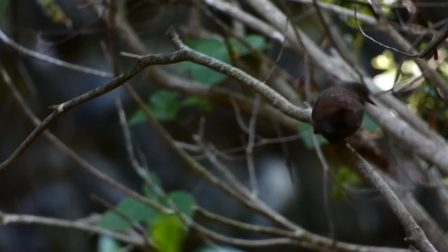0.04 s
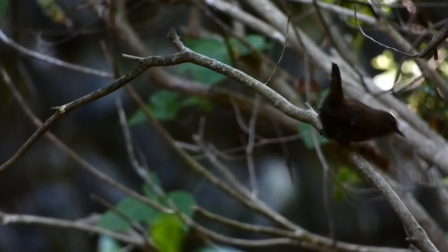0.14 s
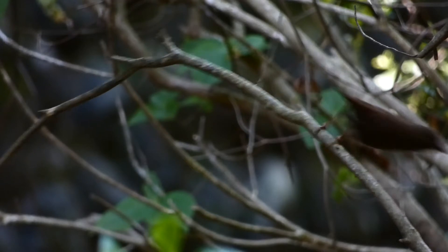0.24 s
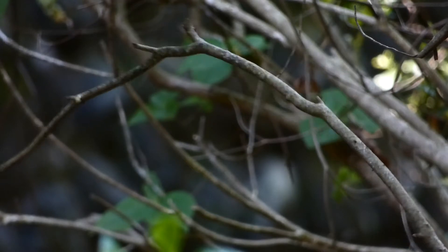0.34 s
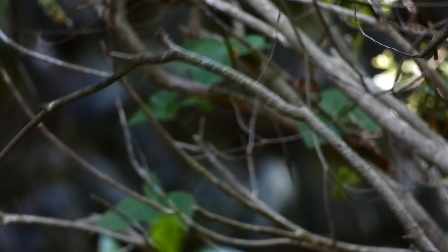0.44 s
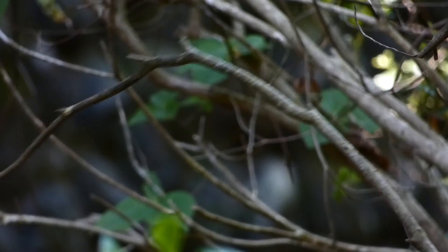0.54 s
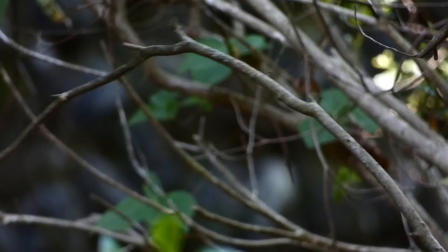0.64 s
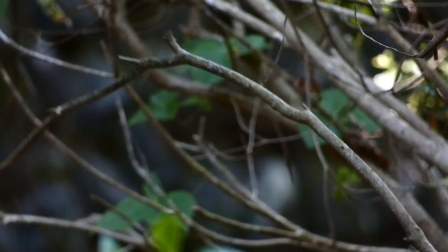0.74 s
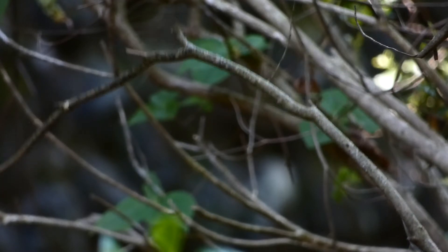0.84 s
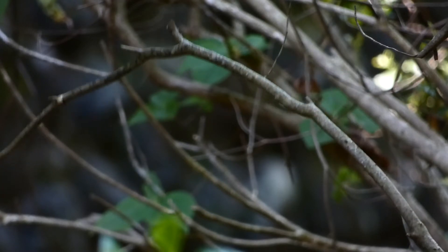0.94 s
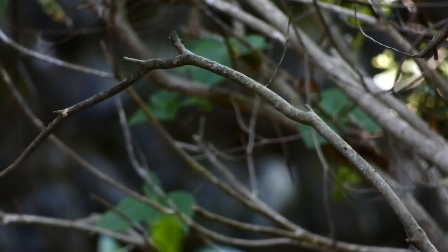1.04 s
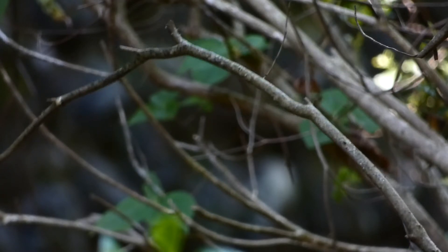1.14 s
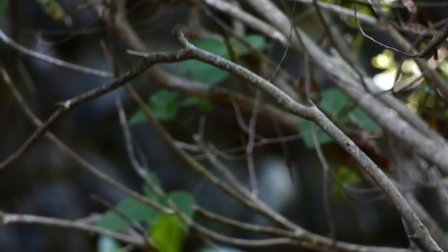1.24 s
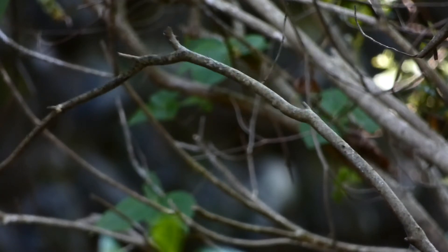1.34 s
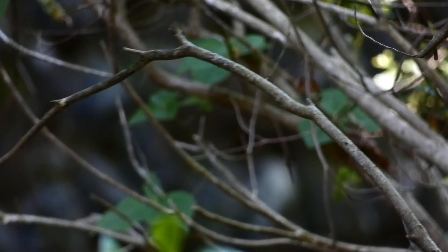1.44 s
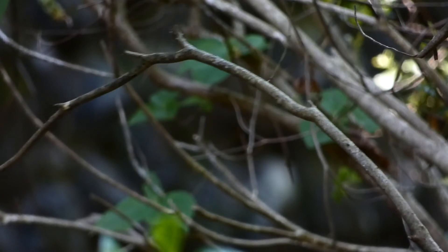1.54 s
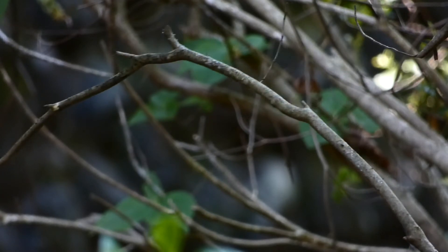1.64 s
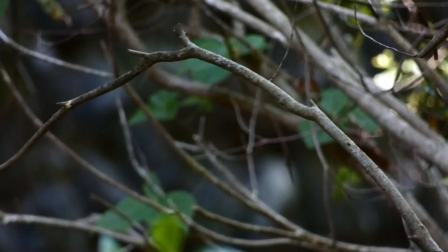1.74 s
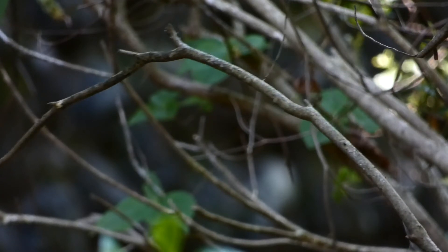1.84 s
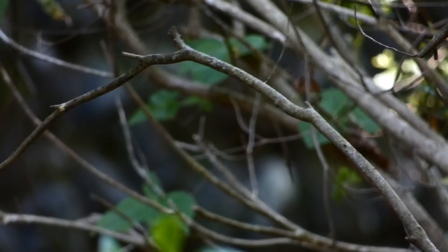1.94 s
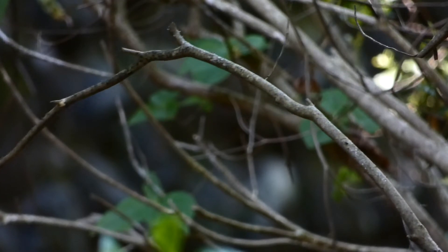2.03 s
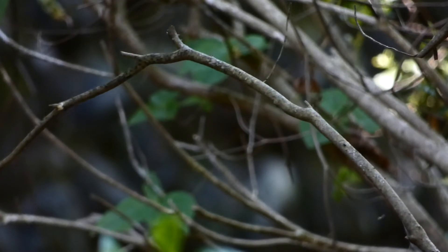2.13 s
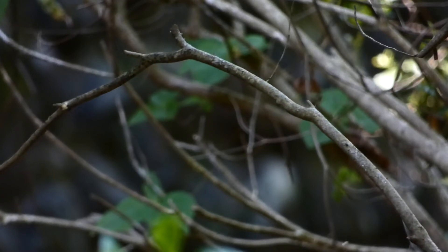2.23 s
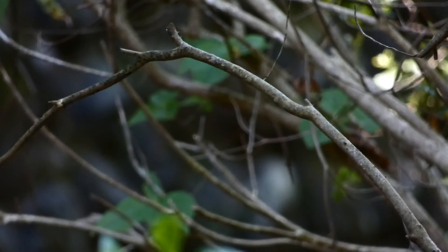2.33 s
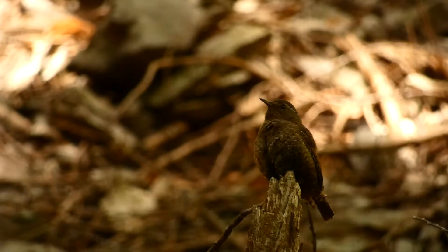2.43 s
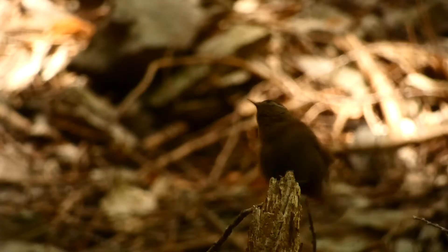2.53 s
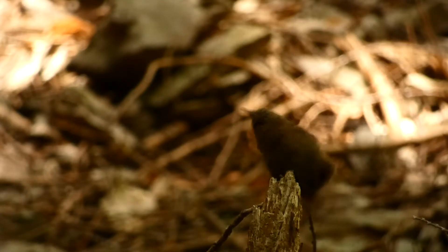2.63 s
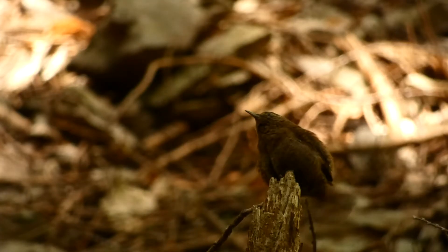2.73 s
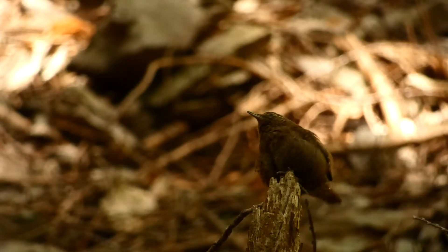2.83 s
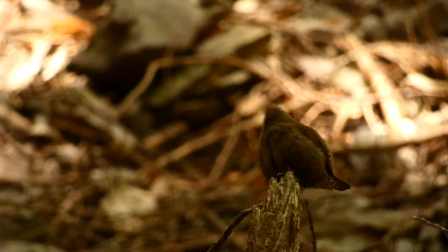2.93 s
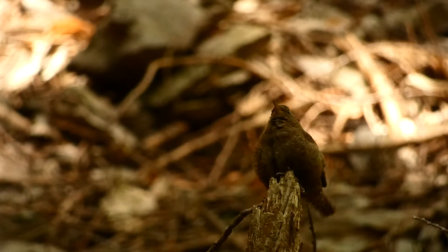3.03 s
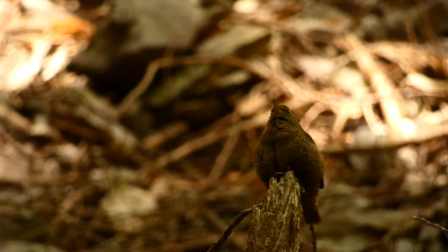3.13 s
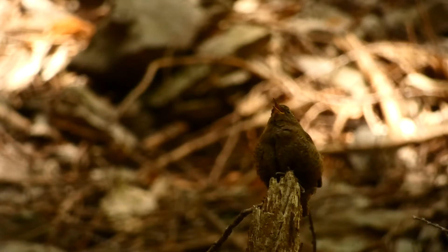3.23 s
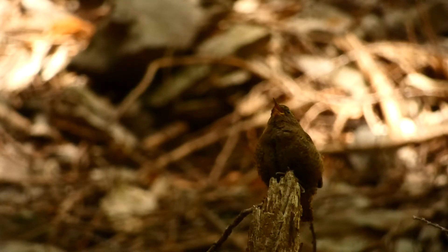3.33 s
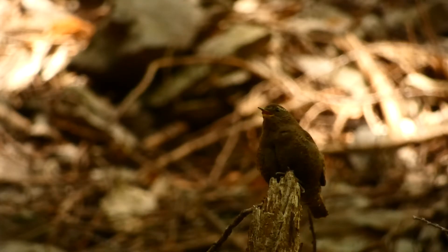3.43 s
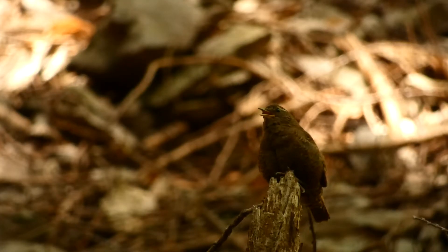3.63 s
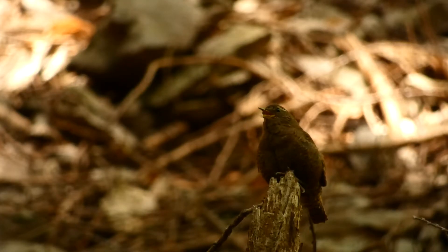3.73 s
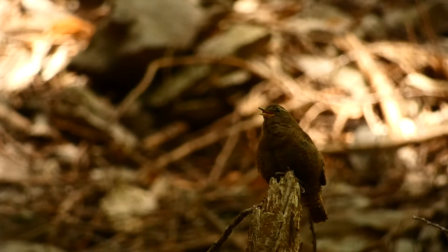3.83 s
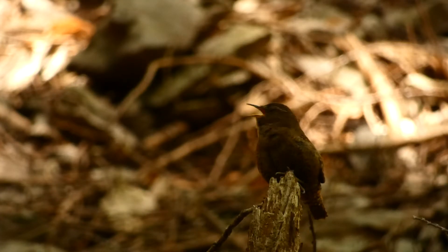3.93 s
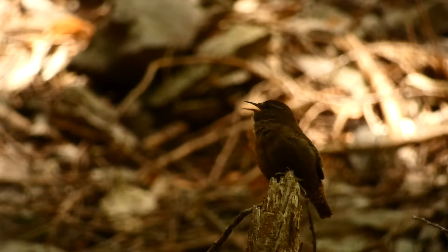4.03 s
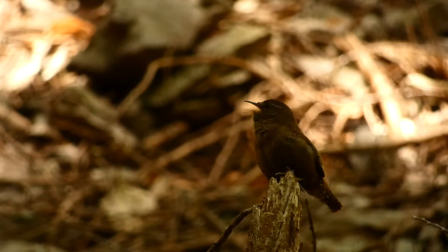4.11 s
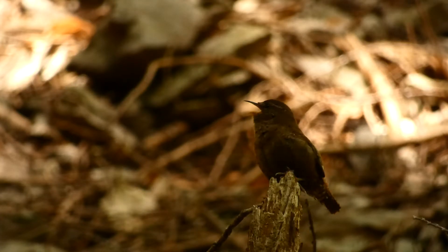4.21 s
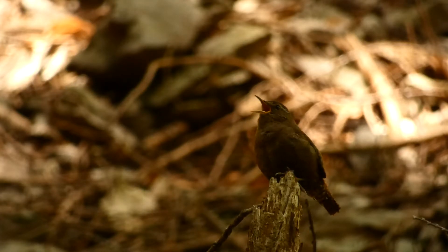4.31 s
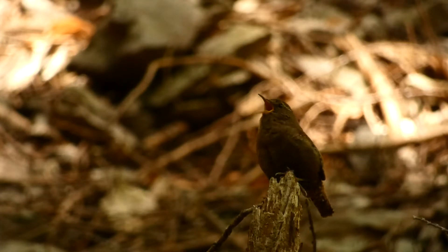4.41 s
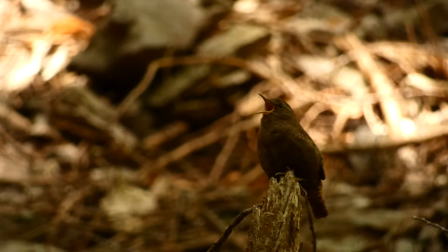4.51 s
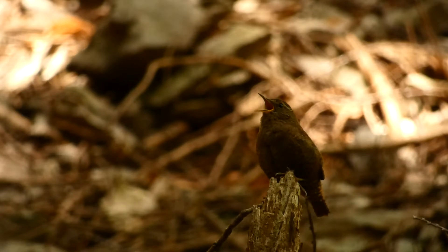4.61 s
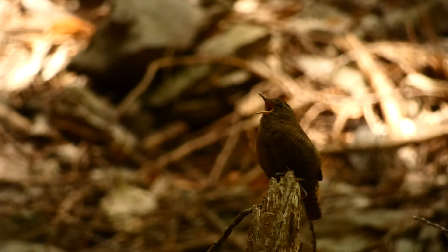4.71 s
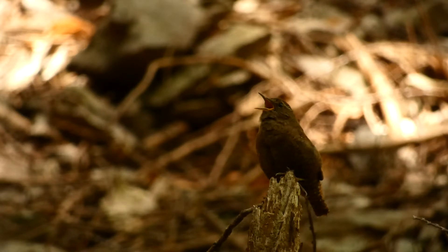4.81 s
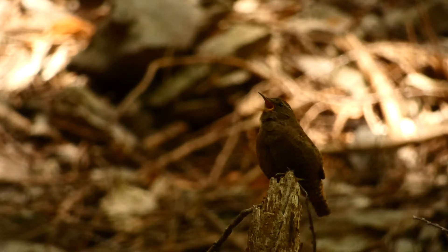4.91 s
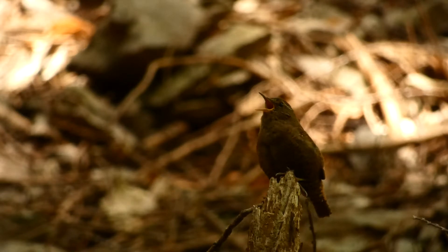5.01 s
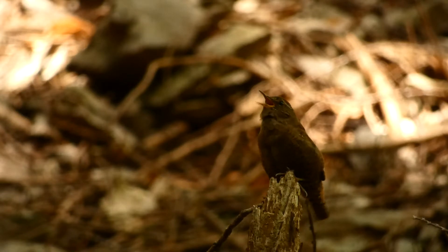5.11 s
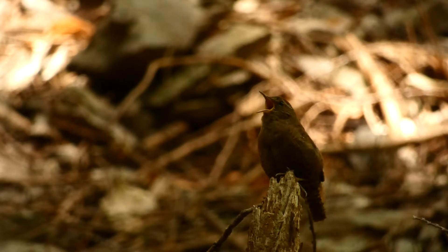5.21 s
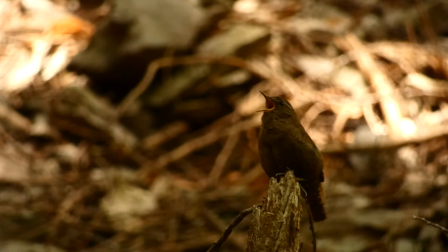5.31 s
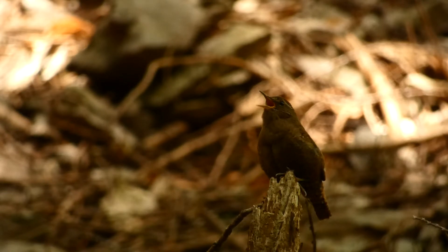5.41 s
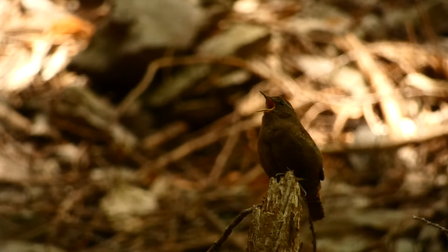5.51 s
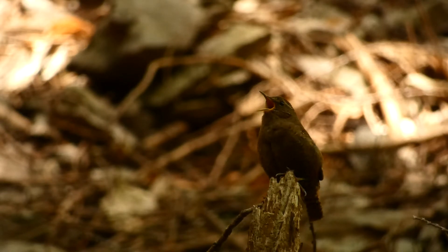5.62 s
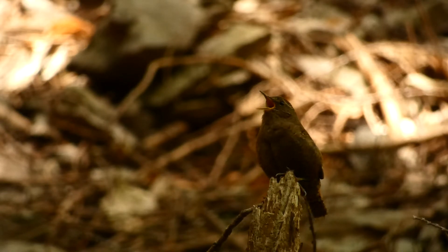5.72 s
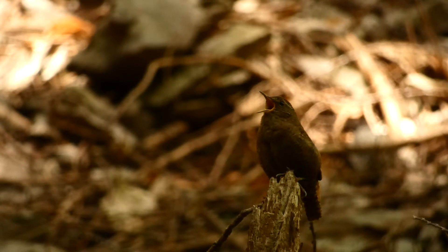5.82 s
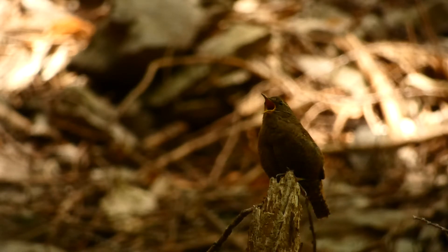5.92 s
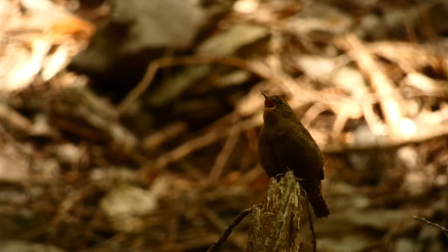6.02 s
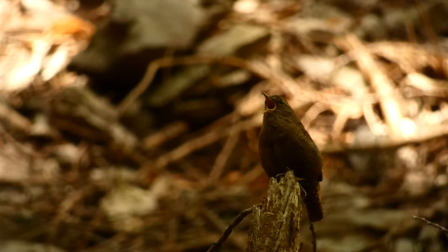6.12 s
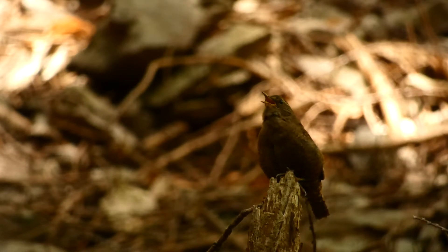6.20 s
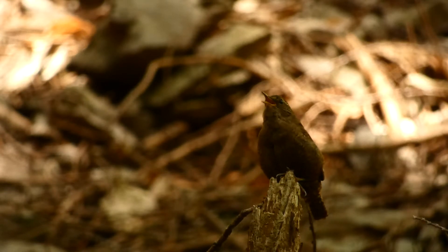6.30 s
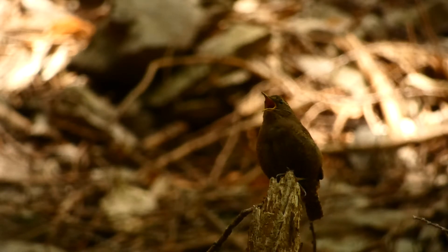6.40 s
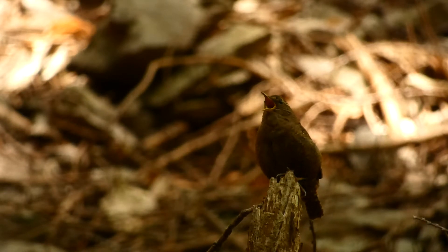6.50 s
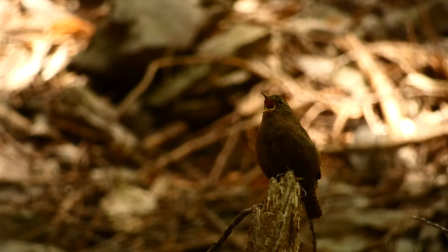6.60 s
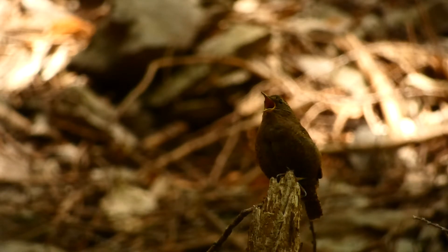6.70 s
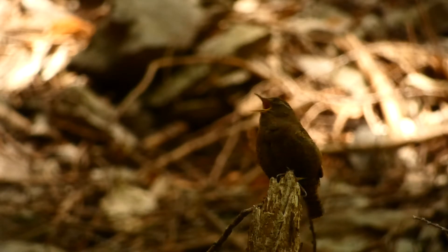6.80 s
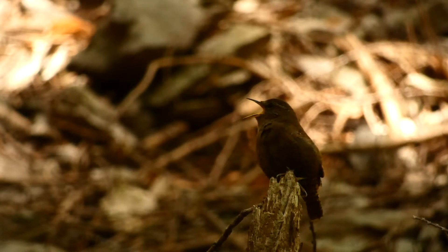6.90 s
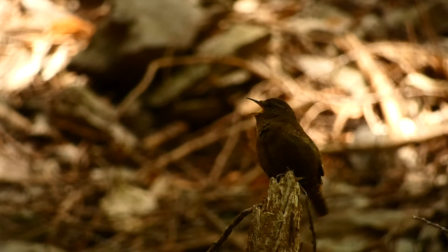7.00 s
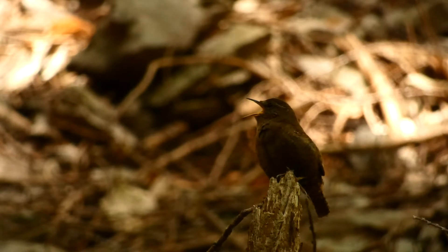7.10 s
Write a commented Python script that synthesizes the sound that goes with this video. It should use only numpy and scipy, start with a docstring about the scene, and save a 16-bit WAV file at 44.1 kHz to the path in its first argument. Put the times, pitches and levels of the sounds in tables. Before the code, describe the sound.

A soft, steady wash of air and water fills a woodland, with faint gurgles and tiny chucks. From about 0.4 seconds a distant wren sings thin, high, echoing notes, growing louder and ending in a quick rough trill from 1.9 to 2.5 seconds. Very faint crows caw in the first second or so.

At 2.6 seconds the sound drops out for an instant and returns with a similar hiss, a faint low wavering hum, soft coos and a second thin, far whistler. From 3 seconds a wren sings close by, louder and clearer, with a short echo. Separate whistles lead to a fast rattle from 4 to 4.5 seconds, three diving notes, then loud rising and falling sweeps from 5.1 to 5.6 seconds. High scooping whistles and sharp downward slurs continue until the end, just after 7 seconds, with two faint caws around 6 and 6.5 seconds.

```python
"""Woodland: a wren sings far among the trees, then, after a brief silence, from a stump close by.
Each note is one gliding whistle that trunks scatter into a long tail.
A soft wash of air and water lies behind it, with gurgles at the far place and a low hum at the near.
Faint chucks, hoarse distant crows, soft coos and a second thin whistler echo through the wood."""
import sys
import numpy as np
from scipy import signal
from scipy.fft import rfft, irfft, next_fast_len
from scipy.io import wavfile
from scipy.ndimage import uniform_filter1d

SR = 44100
rng = np.random.default_rng(int(sys.argv[2]) if len(sys.argv) > 2 else 0)


def pcm_store(signal):
    """Save signal as 16-bit PCM."""
    levels = np.round(np.clip(np.atleast_2d(signal), -1, 1) * 32767)
    wavfile.write(sys.argv[1], SR, levels.astype(np.int16).T)


N = 315315
TIME = np.arange(N) / SR
ALONG = np.linspace(0, 1, 65)  # position within a note


def amp(db):
    """Decibels to gain."""
    return 10 ** (np.asarray(db) / 20)


def unit(x):
    """Scales to rms 1."""
    return x / np.sqrt(np.mean(x ** 2) + 1e-20)


def read(points, hz):
    """Table lookup on a log-frequency axis."""
    freq_hz, value = np.transpose(points)
    return np.interp(np.log(hz + 1), np.log(freq_hz + 1), value)


def add(mix, start_s, sound):
    """Mixes a sound in at start_s."""
    part = mix[max(round(start_s * SR), 0):][:len(sound)]
    part += sound[:len(part)]


def band(size, hz, width_hz):
    """Gaussian noise band, rms 1; a slow wander when centred on 0 Hz."""
    padded = next_fast_len(size + 4096)
    bell = np.exp(-.5 * ((np.fft.rfftfreq(padded, 1 / SR) - hz) / width_hz) ** 2)
    return unit(irfft(rfft(rng.standard_normal(padded)) * bell, padded))[:size]


def puffs(rows, length_s, width_hz):
    """Rounded bursts of narrowband noise."""
    out, size = np.zeros(N), int(length_s * SR)
    for start_s, hz, db in rows:
        add(out, start_s, amp(db) * unit(band(size, hz, width_hz) * np.hanning(size)))
    return out


# left-right likeness of the wash: freq_hz, correlation
WASH_LIKENESS = [(50, -.1), (150, 0.4), (350, 0.03), (650, 0.05), (1200, 0.13), (3000, 0.45), (12000, 0)]

def wash(spectrum, patchy_db):
    """Air and water: steady noise with drifting patches, partly alike in both ears."""
    frames, hz = N // 256 + 5, np.fft.rfftfreq(1024, 1 / SR)
    noise = rng.standard_normal((5, frames, len(hz))).transpose(0, 2, 1)
    left, apart = noise[0] + 1j * noise[1], noise[2] + 1j * noise[3]
    patches = unit(uniform_filter1d(uniform_filter1d(noise[4], size=8, axis=0), size=14, axis=1))
    likeness = read(WASH_LIKENESS, hz)[:, None]
    ears = np.array([left, likeness * left + np.sqrt(1 - likeness ** 2) * apart])
    ears *= amp(read(spectrum, hz)[:, None] + patchy_db * patches)
    return unit(signal.istft(ears, nperseg=1024, noverlap=768)[1][:, :N])


# far wash spectrum: freq_hz, relative_db
FAR_SPECTRUM = [(30, -18), (80, -23.5), (140, -2), (300, -6), (450, -6.5), (800, -8), (1300, -12),
                (2100, -15.5), (3000, -22), (6500, -21.5), (8500, -39), (10000, -30.5), (12500, -37.5),
                (15000, -39)]
# swell of its low band: time_s, gain_db
LOW_SWELL = [(0, 1), (1.3, 2.5), (1.8, 5.5), (2.2, 7), (2.6, 5)]

def far_wash():
    """Wash at the far place; its low band swells."""
    air = amp(-57) * wash(FAR_SPECTRUM, patchy_db=1.2)
    low = signal.sosfilt(signal.butter(1, (280, 650), "band", fs=SR, output="sos"), air)
    swell = amp(np.interp(TIME, *np.transpose(LOW_SWELL)))
    return air + (swell - 1) * low


# water gurgles: start_s, centre_hz, level_db
WATER_GURGLES = [(.1, 550, -64.5), (.315, 598, -58), (.42, 588, -63.5), (.52, 630, -61), (.715, 618, -58),
                 (.89, 612, -61), (.98, 566, -60.5), (1.065, 596, -60), (1.28, 603, -62), (1.515, 607, -58),
                 (1.75, 598, -59), (1.855, 593, -60.5), (1.945, 617, -60), (2.245, 630, -57.5)]

def water():
    """Steady burble and hollow gurgles, all near one pitch."""
    burble = amp(-63) * np.array([band(N, hz=622, width_hz=32) for ear in range(2)])
    return burble + puffs(WATER_GURGLES, length_s=.053, width_hz=24.5)


# undergrowth chucks: start_s, centre_hz, level_db
CHUCK_CALLS = [(.11, 1710, -65), (0.186, 1440, -66), (.19, 2100, -68), (0.709, 1580, -68),
               (1.45, 1480, -72), (1.68, 1300, -65), (1.841, 1410, -62.5), (2.134, 1330, -61.5),
               (2.14, 2090, -67), (2.455, 1650, -64.5), (2.504, 1410, -60)]

def chucks():
    """Short faint noise bursts in the undergrowth."""
    return puffs(CHUCK_CALLS, length_s=.027, width_hz=136)


def song(notes, waver, flutter_db, edge_s, octave_db=-60, glint_hz=4800, spread_hz=350):
    """Trembling, nearly pure glides; the throat passes a faint octave near glint_hz."""
    out = np.zeros(N)
    for start_s, length_s, pitch_hz, level_db in notes:
        fade_s = edge_s + .07 * length_s
        t = np.arange(-fade_s / 2, length_s + fade_s / 2, 1 / SR)
        hz = np.interp(t / length_s, ALONG, pitch_hz)
        phase = 2 * np.pi * np.cumsum(hz * (1 + waver * band(len(t), 0, 140))) / SR
        strength = amp(np.interp(t / length_s, ALONG, level_db) + flutter_db * band(len(t), 0, 76))
        fade = np.sin(np.pi / 2 * np.clip(np.minimum(t - t[0], t[-1] - t) / fade_s, 0, 1)) ** 2
        glint = np.exp(-.5 * ((hz - glint_hz) / spread_hz) ** 2)
        octave = amp(octave_db) * band(len(t), 0, 200) * glint
        add(out, start_s + t[0], strength * fade * (np.sin(phase) + octave * np.sin(2 * phase)))
    return out


def loudness(db, swell_db, arch_db):
    """Note level: a ramp of swell_db, with both ends arch_db lower."""
    return db + swell_db * (ALONG - .5) - arch_db * abs(2 * ALONG - 1) ** 2.4


def slur(start_s, length_s, db, swell_db, from_hz, to_hz, bend, scoop_hz=0, scoop_s=.04, *, arch_db):
    """Exponential glide, entered scoop_hz low; bend > 0 moves early, bend < 0 late."""
    travel = np.cumsum(np.exp(-bend * ALONG))
    glide_hz = from_hz + (to_hz - from_hz) * (travel - travel[0]) / (travel[-1] - travel[0])
    scoop = np.maximum(1 - ALONG * length_s / scoop_s, 0) ** 2
    return start_s, length_s, glide_hz - scoop_hz * scoop, loudness(db, swell_db, arch_db)


def even_slurs(rows, bend, arch_db):
    """Slurs with one bend and no swell."""
    return [slur(start_s, length_s, db, 0, from_hz, to_hz, bend, arch_db=arch_db)
            for start_s, length_s, db, from_hz, to_hz in rows]


def trill(syllable, repeats, arch_db):
    """A syllable of slurs, repeated with shifts of level and pitch."""
    return [slur(start_s + delay_s, length_s, db + shift_db, swell_db,
                 from_hz + shift_hz, to_hz + shift_hz, bend, scoop_hz, arch_db=arch_db)
            for start_s, shift_db, shift_hz in repeats
            for delay_s, length_s, db, swell_db, from_hz, to_hz, bend, scoop_hz in syllable]


def woods(sound, decay, onset_s, early_db, early_s, likeness):
    """Trunk echoes: strong early scatter, then a long tail whose decay varies with frequency."""
    t = np.arange(int(1.5 * SR)) / SR
    taps = rng.standard_normal((3, len(t))) * (rng.random((3, len(t))) < .03 + .5 * t)
    taps *= (1 - np.exp(-(t / onset_s) ** 2)) * (1 + amp(early_db) * np.exp(-t / early_s))
    ears = np.sqrt(likeness) * taps[2] + np.sqrt(1 - likeness) * taps[:2]
    hz, age_s, spectra = signal.stft(ears, SR, nperseg=256)
    tail = signal.istft(spectra * amp(-60 * age_s / read(decay, hz)[:, None]), SR, nperseg=256)[1]
    tail /= np.linalg.norm(tail, axis=1, keepdims=True)
    return signal.fftconvolve(sound[None], tail, axes=1)[:, :N]


# raspy notes: start_s, length_s, level_db, from_hz, to_hz
RASPY_NOTES = [(.425, 0.05, -60, 5980, 5880), (.69, 0.048, -61, 7000, 7720),
               (.77, 0.034, -53.5, 5890, 5580), (1.125, 0.13, -51, 7960, 7680),
               (1.28, .08, -50.5, 7980, 7750), (1.8, 0.038, -57, 6900, 6800)]
# clear notes: start_s, length_s, level_db, swell_db, from_hz, to_hz, bend
CLEAR_NOTES = [(0.475, 0.082, -58.5, -6, 5500, 5160, 1), (0.571, 0.054, -48, 12, 3980, 3610, 0.2),
               (0.662, 0.066, -55.5, -13, 3840, 3656, 0.5), (0.833, 0.055, -40.5, -5, 5265, 5276, -2),
               (0.942, 0.12, -40.5, 9, 6540, 6273, 5), (1.406, 0.072, -36, 7, 6200, 6267, 1.5),
               (1.463, 0.047, -35, -1, 6350, 4520, 0.4), (1.541, 0.043, -52.5, 0, 3990, 4090, 2.5),
               (1.619, 0.049, -38.5, 4, 4073, 4066, 0.5), (1.698, .058, -36.5, -3, 5003, 5130, -0.5),
               (1.781, 0.03, -38.5, -3, 6560, 6310, 0), (1.854, 0.05, -37, 4, 6050, 4780, -0.4)]
# trill syllable: delay_s, length_s, level_db, swell_db, from_hz, to_hz, bend, scoop_hz
TRILL_SYLLABLE = [(.003, .021, -38.5, 5, 5250, 6095, 0.27, 0), (.04, .056, -32, 4.5, 6185, 4437, 2.2, 0)]
# trill repeats: start_s, shift_db, shift_hz
TRILL_REPEATS = [(1.924, 0, 50.5), (2.054, -2.5, 7), (2.176, -3.5, 18.5), (2.298, -2.5, 27),
                 (2.418, -4.5, -44)]
# echo decay, far place: freq_hz, t60_s
FAR_DECAY = [(3750, 0.39), (4100, 0.79), (5000, 0.64), (6500, 0.42), (8500, 0.62)]

def far_wren():
    """Wren deep in the trees, more echo than voice: thin notes, then a rough trill."""
    clear = [slur(*row, arch_db=5.5) for row in CLEAR_NOTES]
    raspy = even_slurs(RASPY_NOTES, bend=1.5, arch_db=8)
    syllables = trill(TRILL_SYLLABLE, TRILL_REPEATS, arch_db=6.5)
    voice = song(clear, waver=.006, flutter_db=1.6, edge_s=.008)
    voice += song(raspy, waver=.018, flutter_db=2.5, edge_s=.01)
    voice += song(syllables, waver=.011, flutter_db=2, edge_s=.008)
    echo = woods(voice, FAR_DECAY, onset_s=.0026, early_db=3, early_s=.022, likeness=.76)
    return (amp(-7) * voice + echo) * amp([[.3], [-.3]])


# caws: start_s, length_s, pitch_hz, resonance_hz, level_db
CROW_CAWS = [(0.439, 0.067, 414, 1200, -62.5), (0.762, 0.085, 407.4, 1130, -62),
             (1.126, 0.13, 415.5, 1100, -64), (5.957, 0.1, 371, 1056, -63), (6.484, 0.11, 336, 950, -57)]

def crows(width_hz=390, upper_hz=2150, upper_db=-15, rasp_hz=33, rasp_db=5):
    """Hoarse, throbbing arched calls through two throat resonances."""
    def resonance(hz, centre_hz):
        return 1 / (1 + ((hz - centre_hz) / width_hz) ** 2) ** 2

    out = np.zeros(N)
    for start_s, length_s, pitch_hz, lower_hz, db in CROW_CAWS:
        arch = np.sin(np.linspace(0, np.pi, int(length_s * SR)))
        hz = pitch_hz * (.93 + .07 * arch + .05 * band(len(arch), 0, 200))
        phase = 2 * np.pi * np.cumsum(hz) / SR
        voice = sum((resonance(k * hz, lower_hz) + amp(upper_db) * resonance(k * hz, upper_hz))
                    * np.sin(k * phase) for k in range(2, 8))
        rasp = amp(-rasp_db * np.cos(2 * np.pi * rasp_hz * TIME[:len(arch)]))
        add(out, start_s, amp(db) * unit(np.sqrt(abs(arch)) * rasp * voice))
    return out


# soft coos: start_s, length_s, level_db
COO_NOTES = [(2.617, 0.25, -67), (3.524, 0.3, -69.5), (4.67, 0.29, -70), (4.967, 0.13, -68.5),
             (5.669, 0.32, -71), (6.748, 0.29, -70.5)]

def coos(pitch_hz=369, waver=.009):
    """Low hollow notes on one pitch, unsteady in strength."""
    out = np.zeros(N)
    for start_s, length_s, db in COO_NOTES:
        size = int(length_s * SR)
        phase = 2 * np.pi * np.cumsum(pitch_hz * (1 + waver * band(size, 0, 30))) / SR
        strength = amp(2.5 * band(size, 0, 14)) * signal.windows.tukey(size, .3)
        add(out, start_s, amp(db) * unit(np.sin(phase) * strength))
    return out


# echo decay, near place and background calls: freq_hz, t60_s
NEAR_DECAY = [(500, 0.41), (3500, 0.86), (5000, 0.63), (6500, 0.54), (8500, 0.55)]

def background_calls():
    """Crows, coos and chucks, scattered by trunks."""
    calls = crows() + coos() + chucks()
    echo = woods(calls, NEAR_DECAY, onset_s=.002, early_db=6, early_s=.03, likeness=.12)
    return amp(3) * calls + amp(2.5) * echo


# near wash spectrum: freq_hz, relative_db
NEAR_SPECTRUM = [(30, -25.5), (80, -18.5), (125, -12.5), (300, -3), (750, -5.5), (1350, -12), (1500, -18.5),
                 (2100, -15), (3000, -22), (6500, -23), (8500, -37.5), (10000, -32.5), (13500, -36.5),
                 (14600, -48.5)]

def near_wash():
    """Patchier wash at the near place."""
    return amp(-58) * wash(NEAR_SPECTRUM, patchy_db=2.06)


# hum contour: time_s, pitch_hz, level_db
HUM_PATH = [(2.65, 155, -67), (2.85, 150, -74), (3.0, 157, -60.5), (3.35, 142, -66.5), (3.6, 154.1, -68),
            (3.88, 157.5, -67.5), (4.17, 137.6, -75), (4.33, 156.7, -64.5), (4.7, 150.7, -69.5),
            (4.98, 148.1, -68), (5.2, 156.2, -62), (5.4, 136.2, -75), (5.55, 153.3, -65.5),
            (6.0, 147.8, -66.5), (6.25, 157.4, -66), (6.55, 151.7, -66.5), (6.8, 156.8, -63),
            (7.12, 155, -65)]

def hum(octave_db=-8, unsteady=.66, gain_db=-1):
    """Low wavering tone and its octave; distance makes it unsteady in each ear."""
    def fading():
        return 1 + unsteady * (band(N, 0, 7) + 1j * band(N, 0, 5.6))

    time_s, hz, db = np.transpose(HUM_PATH)
    tone = np.exp(2j * np.pi * np.cumsum(np.interp(TIME, time_s, hz)) / SR)
    ears = [unit((tone * fading() + amp(octave_db) * tone ** 2 * fading()).real) for ear in range(2)]
    return amp(gain_db + np.interp(TIME, time_s, db)) * np.array(ears)


# thin whistles: start_s, length_s, level_db, from_hz, to_hz
SECOND_BIRD_NOTES = [(2.52, 0.076, -56, 4790, 4660), (2.625, 0.028, -62, 5300, 5560),
                     (2.735, 0.018, -59.5, 5240, 5600), (2.835, 0.025, -49, 4660, 4870),
                     (2.88, 0.028, -59.5, 4930, 4590), (2.98, 0.022, -56.5, 5220, 5670),
                     (3.185, 0.05, -52.5, 4850, 4790), (3.535, 0.046, -53, 4900, 4720),
                     (6.925, 0.047, -53.5, 4860, 4724)]

def second_bird():
    """Thin whistles far off, mostly echo."""
    notes = even_slurs(SECOND_BIRD_NOTES, bend=.3, arch_db=1)
    voice = song(notes, waver=.005, flutter_db=1.5, edge_s=.012)
    echo = woods(voice, NEAR_DECAY, onset_s=.006, early_db=6, early_s=.05, likeness=.3)
    return amp(-7) * voice + amp(2) * echo


# close whistles: start_s, length_s, level_db, swell_db, from_hz, middle_hz, to_hz
BOWED_NOTES = [(3, 0.049, -47.5, 10.5, 5540, 5560, 5560), (3.084, 0.036, -56, 5, 7000, 6680, 7600),
               (3.222, 0.049, -36.5, 11.5, 4055, 4276, 4510), (3.383, 0.15, -31, 15, 6710, 6500, 6420),
               (3.588, 0.035, -44, 18, 8680, 7960, 8240), (3.677, 0.092, -25.5, 5, 4970, 4845, 4590),
               (3.92, 0.067, -26, 18, 5230, 5410, 5560), (5.85, 0.026, -31.5, 5.5, 7400, 7180, 7630),
               (6.07, 0.012, -26, 7.5, 4880, 5620, 6100), (6.359, 0.029, -27, 2.5, 3960, 4020, 3750),
               (6.672, 0.031, -25.5, 11.5, 5920, 5950, 5130), (6.732, 0.07, -21, -1, 6610, 6500, 6770)]
# close downslurs: start_s, length_s, level_db, swell_db, from_hz, to_hz, bend
DOWNSLURS = [(3.147, 0.033, -47.5, -3, 5200, 3920, 3), (3.298, 0.022, -35, -1.5, 5650, 4050, 1.4),
             (3.841, 0.033, -37.5, -24, 5200, 3630, 4), (4.976, 0.066, -20, 7, 4670, 4060, -2),
             (6.115, 0.055, -19, -4.5, 5930, 4448, 3.5), (6.228, 0.094, -23.5, 21.5, 8110, 4958, 3),
             (6.405, 0.077, -29.5, -2, 3796, 3413, 1.7)]

def single_notes():
    """Whistles bowed along a parabola of pitch, and falling slurs."""
    notes = []
    for start_s, length_s, db, swell_db, *pitch_hz in BOWED_NOTES:
        bow_hz = np.polyval(np.polyfit([0, .5, 1], pitch_hz, 2), ALONG)
        notes.append((start_s, length_s, bow_hz, loudness(db, swell_db, arch_db=12.5)))
    return notes + [slur(*row, arch_db=6.5) for row in DOWNSLURS]


# rattle: flick_start_s, flick_length_s, flick_db, flick_shift_hz, tick_length_s, tick_db, tick_from_hz
RATTLE_PAIRS = [(4.045, .016, -26, 130, 0.014, -29.5, 4610), (4.112, 0.014, -25.5, -0.5, .016, -31, 4380),
                (4.178, 0.018, -26.5, -23.5, 0.014, -32, 4280),
                (4.246, 0.018, -28, 12.5, 0.017, -33.5, 4275), (4.316, .017, -25, 69.5, 0.013, -31.5, 4200),
                (4.385, .014, -23, -33, .013, -31, 4310), (4.453, 0.015, -23, 12.5, 0.019, -30, 4300)]

def rattle(gap_s=.0084):
    """Fast pairs: a soft tick that swells as it drops, then a loud upward flick."""
    notes = []
    for start_s, length_s, db, shift_hz, tick_s, tick_db, tick_hz in RATTLE_PAIRS:
        notes.append(slur(start_s - gap_s - tick_s, tick_s, tick_db, swell_db=5,
                          from_hz=tick_hz, to_hz=3620, bend=-1.7, arch_db=12))
        notes.append(slur(start_s, length_s, db, swell_db=0,
                          from_hz=4250 + shift_hz, to_hz=5570 + shift_hz, bend=.73, arch_db=9.5))
    return notes


def contour_trill(path, repeats):
    """One contour of pitch and level, repeated with shifts of both."""
    age_s, hz, db = np.transpose(path)
    length_s = age_s[-1] - age_s[0]
    t = age_s[0] + ALONG * length_s
    pitch_hz = uniform_filter1d(np.interp(t, age_s, hz), size=5, mode="nearest")
    level_db = np.interp(t, age_s, db)
    return [(start_s + age_s[0], length_s, pitch_hz + shift_hz, level_db + shift_db)
            for start_s, shift_db, shift_hz in repeats]


# lead-in flick: delay_s, length_s, level_db, swell_db, from_hz, to_hz, bend, scoop_hz
LEAD_FLICK = [(-0.023, 0.0076, -35, 4, 6350, 7300, -0.6, 0.0031)]
# dive contour: age_s, pitch_hz, level_db
DIVE_PATH = [(0, 7550, -49.5), (.007, 6970, -31.5), (.032, 6970, -27.5), (.056, 6690, -28.5),
             (0.067, 6370, -22), (.08, 5775, -22.5), (0.086, 5300, -34.5)]
# dive repeats: start_s, shift_db, shift_hz
DIVES = [(4.53, 0.032, -17.5), (4.682, 0.42, 9.5), (4.841, 0.13, 6)]

def dives():
    """High held notes that dive, each led in by a flick."""
    return trill(LEAD_FLICK, DIVES, arch_db=8) + contour_trill(DIVE_PATH, DIVES)


# rising and falling sweeps: age_s, pitch_hz, level_db
RISE_PATH = [(0, 4620, -31.5), (.022, 4670, -20), (.035, 5094, -17.5), (.058, 6040, -23.5),
             (.07, 6540, -35)]
FALL_PATH = [(.118, 6300, -34), (.132, 5416, -22), (.146, 5017, -18.5), (.184, 4350, -20),
             (.198, 4180, -21.5), (.209, 3910, -27.5)]
# seesaw repeats: start_s, shift_db, shift_hz
SEESAWS = [(5.102, 0.00088, 6.5), (5.369, 0.0028, -11)]

def seesaw():
    """Loud sweeps, up and down in turn."""
    return contour_trill(RISE_PATH, SEESAWS) + contour_trill(FALL_PATH, SEESAWS)


# scooped whistles: start_s, length_s, level_db, swell_db, from_hz, to_hz, bend, scoop_hz, scoop_s
SCOOPED_NOTES = [(5.646, 0.18, -36, -7.5, 7874, 7784, -1, 713, 0.051),
                 (5.924, 0.11, -21, 6, 6432, 5660, -10.5, 262, 0.046),
                 (6.545, 0.1, -39, 12, 9020, 7945, 1, 1960, 0.062),
                 (6.856, 0.128, -31.5, 7, 7780, 7404, 1.5, 841, .05),
                 (7.045, 0.14, -34, 8.5, 7940, 7480, 0.5, 560, 0.039)]

def scoops():
    """Long whistles that scoop up to pitch, then sag."""
    return [slur(*row, arch_db=5) for row in SCOOPED_NOTES]


def near_wren():
    """Wren close ahead, more voice than echo."""
    notes = single_notes() + dives() + seesaw() + scoops()
    voice = song(notes, waver=.0035, flutter_db=.9, edge_s=.006, octave_db=-50)
    voice += song(rattle(), waver=.015, flutter_db=1.6, edge_s=.005)
    echo = woods(voice, NEAR_DECAY, onset_s=.019, early_db=9, early_s=.058, likeness=.76)
    return (amp(.8) * voice + amp(-7) * echo) * amp([[-.3], [.3]])


def scene(leave_s=2.582, arrive_s=2.618):
    """Far place, a moment of near silence, near place."""
    calls = background_calls()
    far = far_wren() + far_wash() + water() + calls
    near = near_wren() + (near_wash() + hum() + calls + second_bird()) * amp([[-.7], [.7]])
    fade_out = np.clip((leave_s - TIME) / .015, .02, 1) * (TIME < arrive_s)
    fade_in = np.clip((TIME - arrive_s) / .003, 0, 1)
    return fade_out * far + fade_in * near


def record(dry, cutoff_hz=15600):
    """Steep low-pass band limit."""
    lowpass = signal.firwin(511, cutoff_hz, window=("kaiser", 9), fs=SR)
    return signal.oaconvolve(dry, lowpass[None], "same")


dry = scene()
out = record(dry)
pcm_store(out)
```